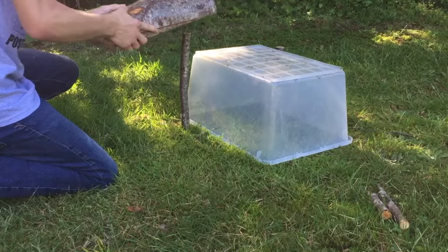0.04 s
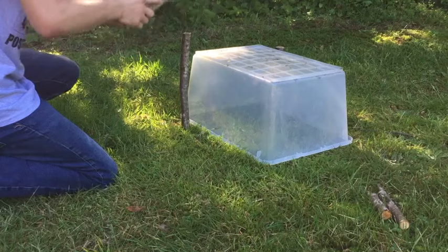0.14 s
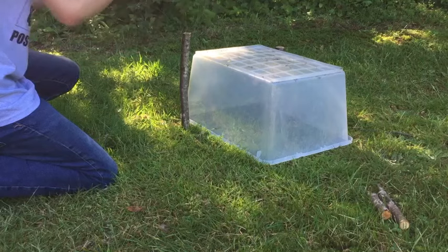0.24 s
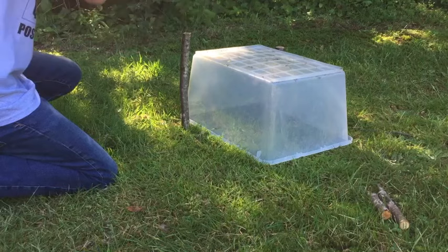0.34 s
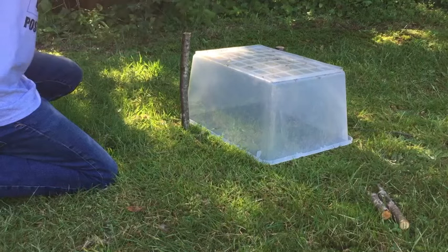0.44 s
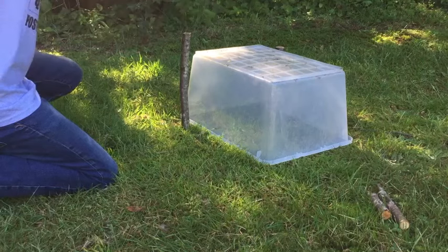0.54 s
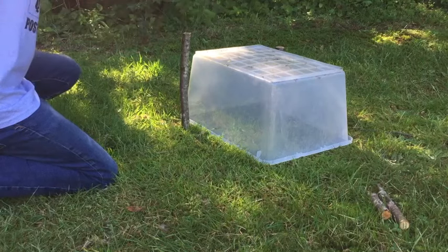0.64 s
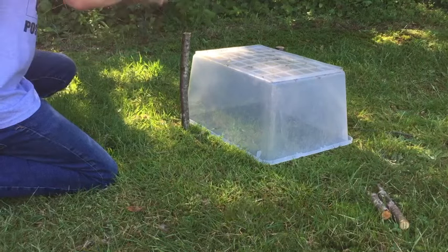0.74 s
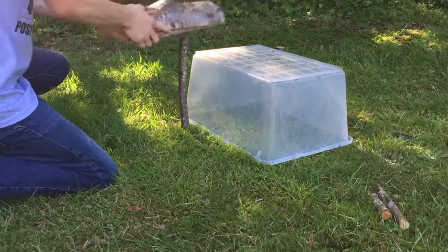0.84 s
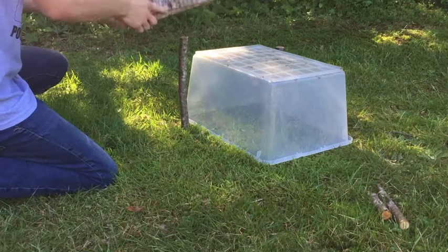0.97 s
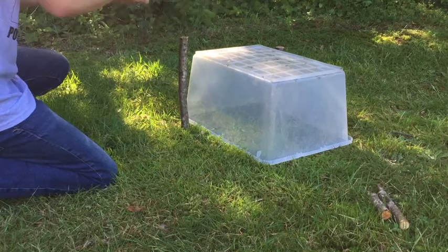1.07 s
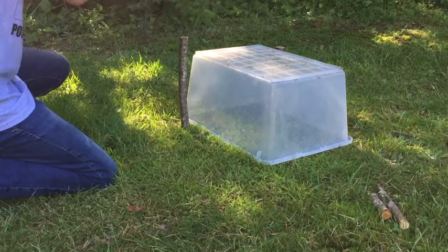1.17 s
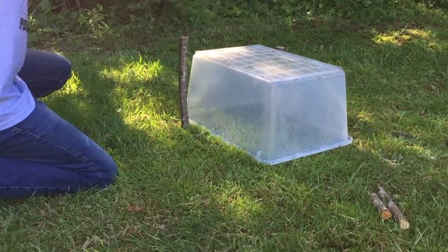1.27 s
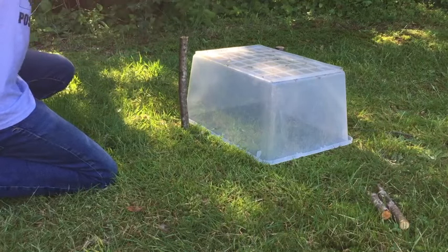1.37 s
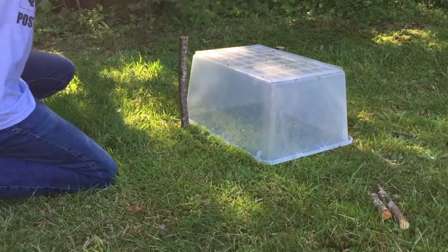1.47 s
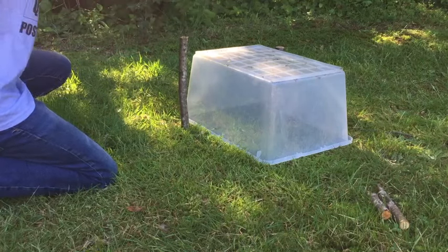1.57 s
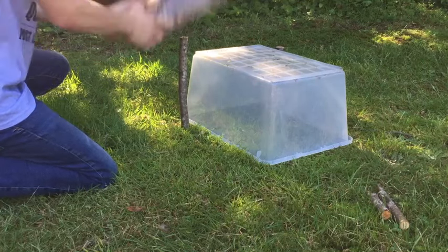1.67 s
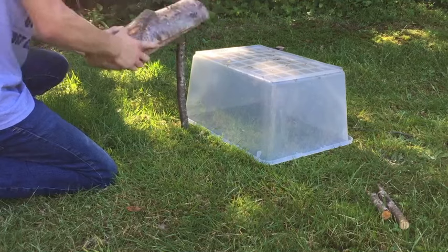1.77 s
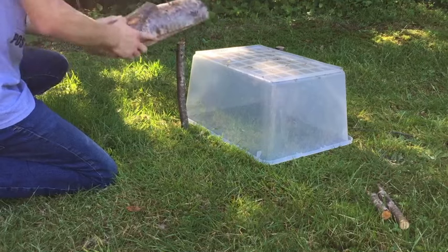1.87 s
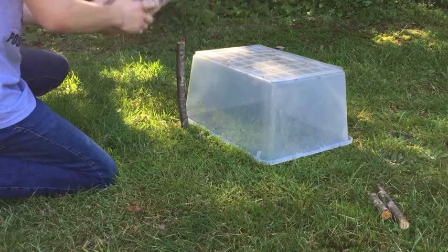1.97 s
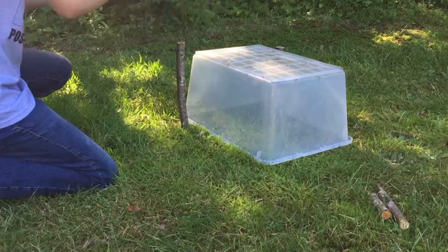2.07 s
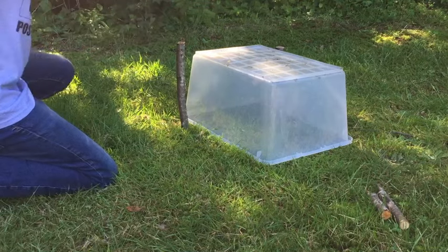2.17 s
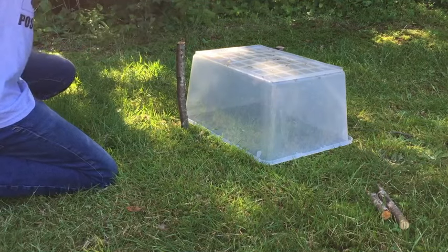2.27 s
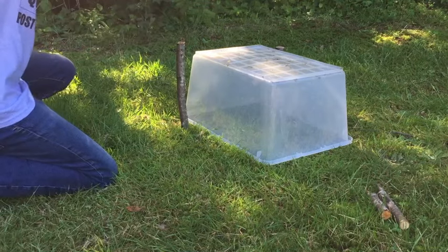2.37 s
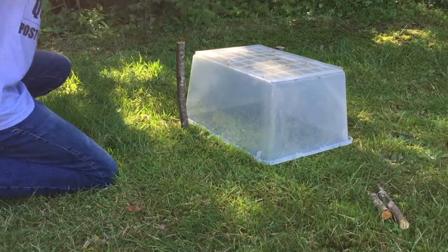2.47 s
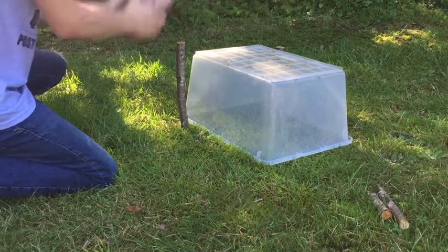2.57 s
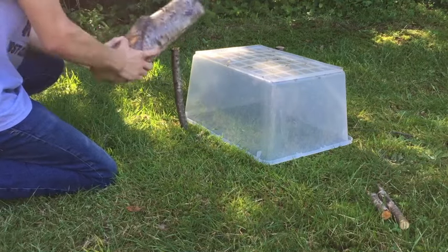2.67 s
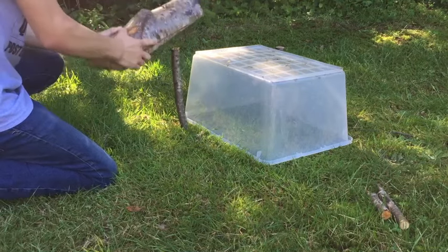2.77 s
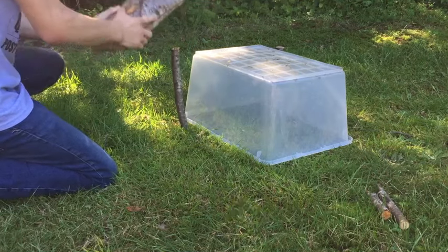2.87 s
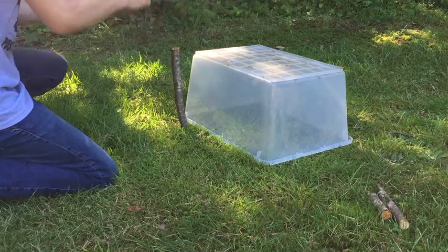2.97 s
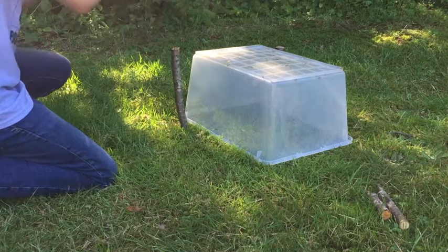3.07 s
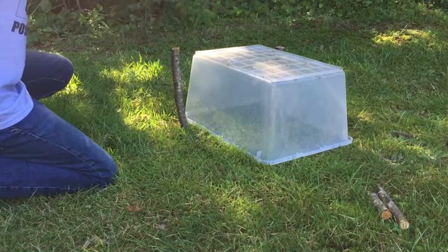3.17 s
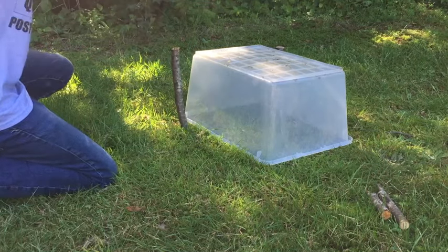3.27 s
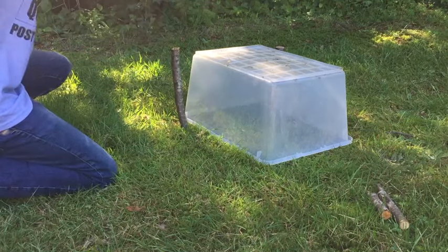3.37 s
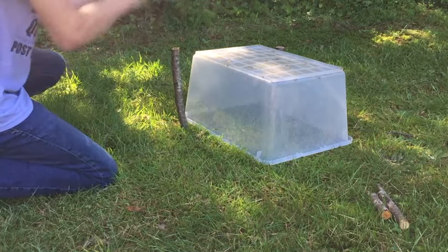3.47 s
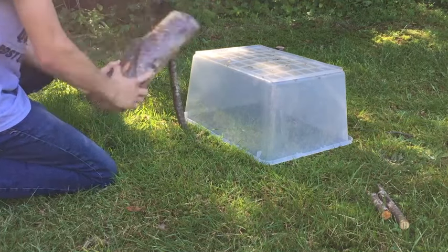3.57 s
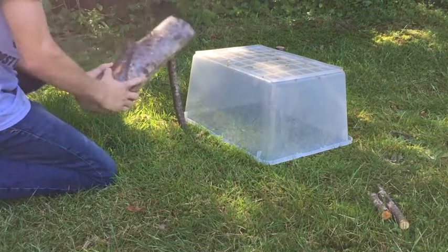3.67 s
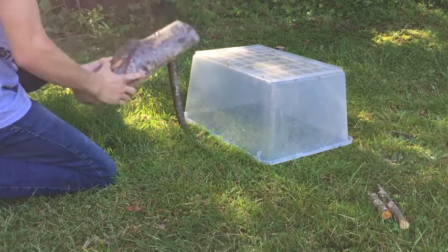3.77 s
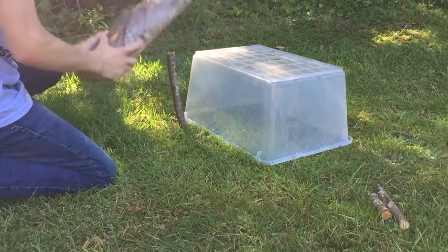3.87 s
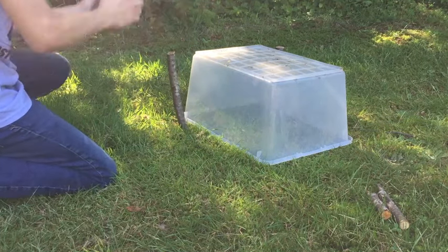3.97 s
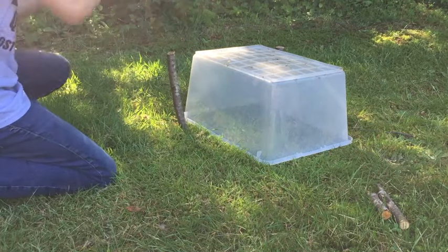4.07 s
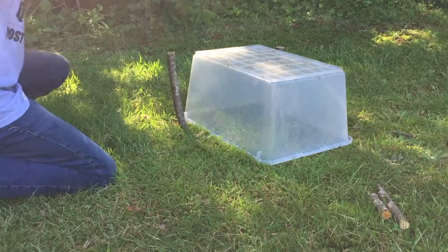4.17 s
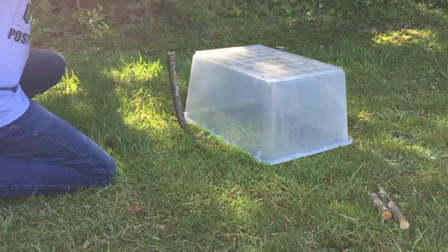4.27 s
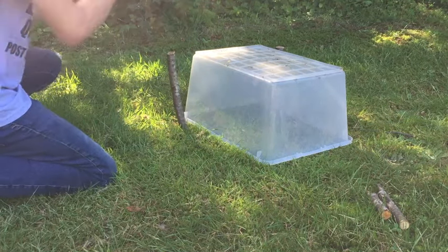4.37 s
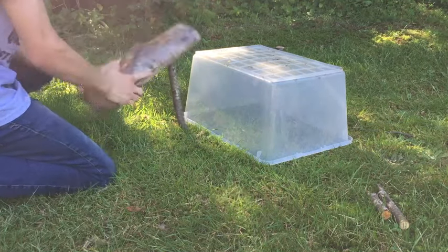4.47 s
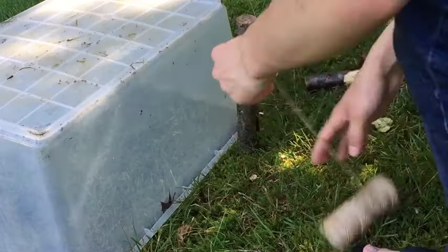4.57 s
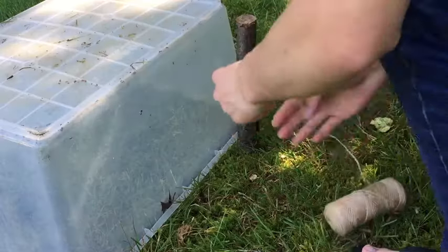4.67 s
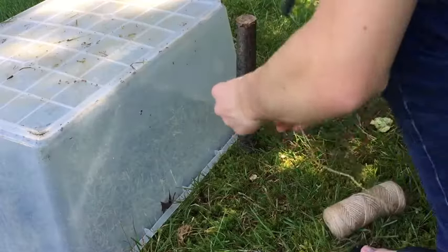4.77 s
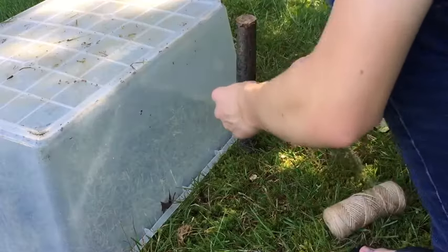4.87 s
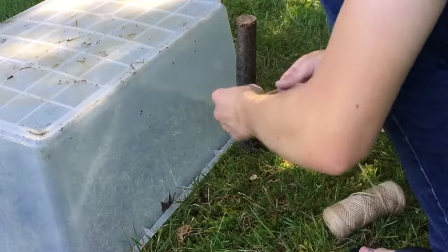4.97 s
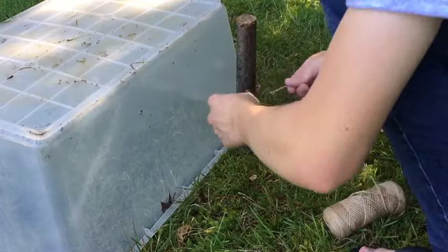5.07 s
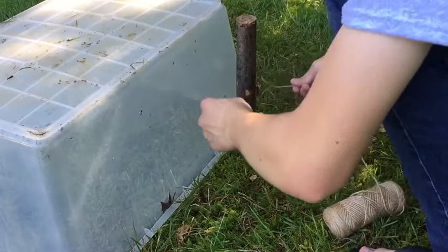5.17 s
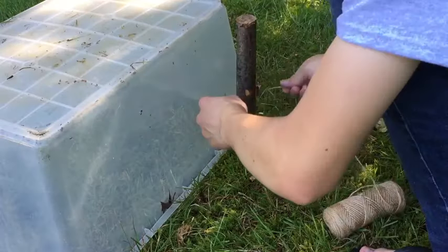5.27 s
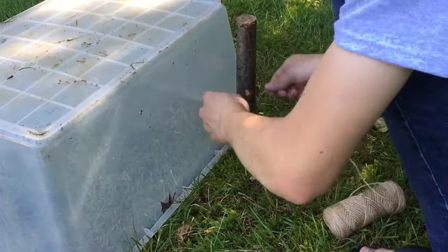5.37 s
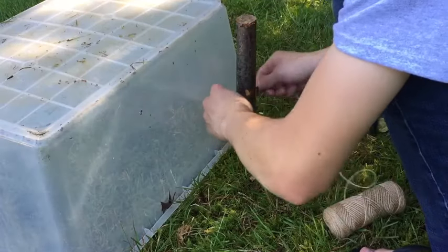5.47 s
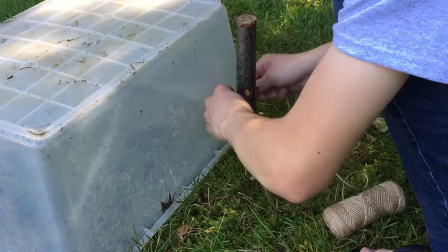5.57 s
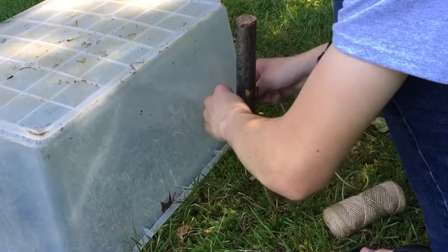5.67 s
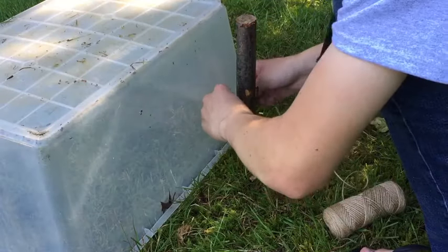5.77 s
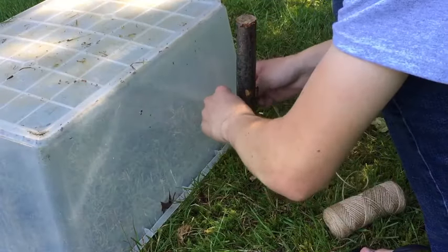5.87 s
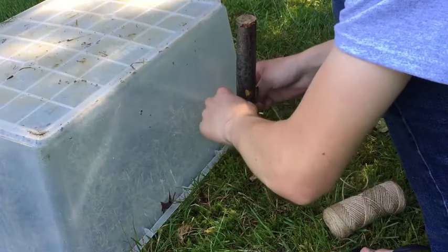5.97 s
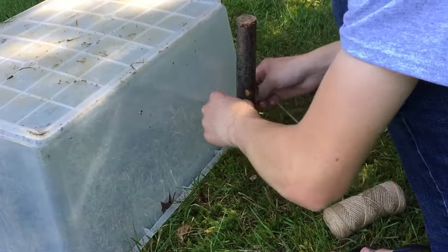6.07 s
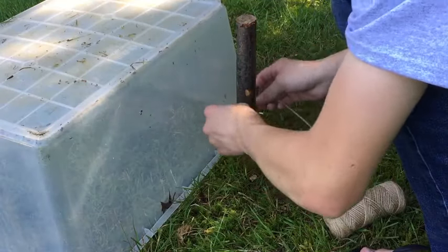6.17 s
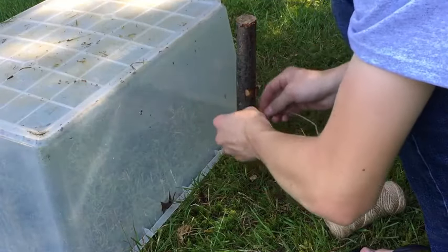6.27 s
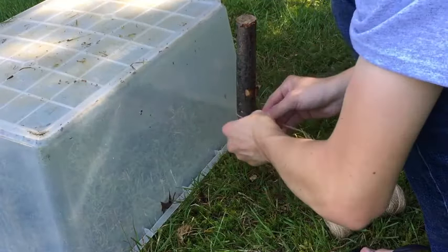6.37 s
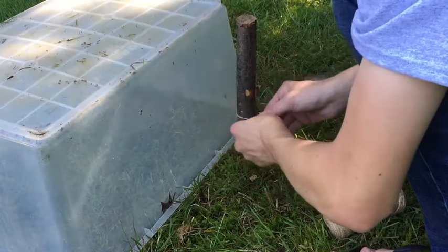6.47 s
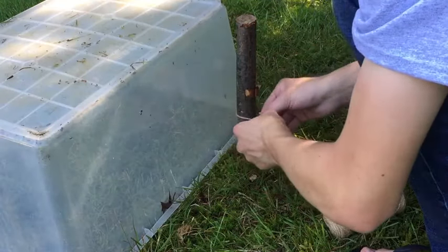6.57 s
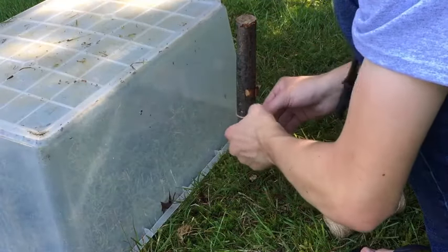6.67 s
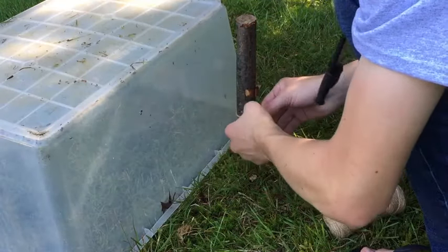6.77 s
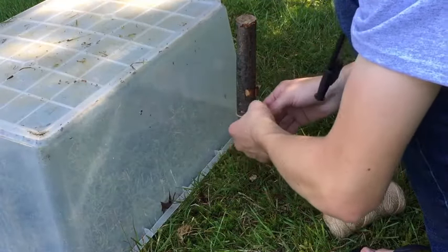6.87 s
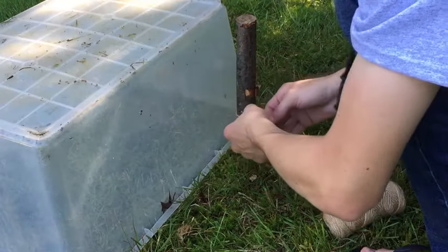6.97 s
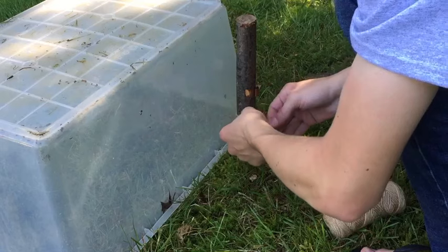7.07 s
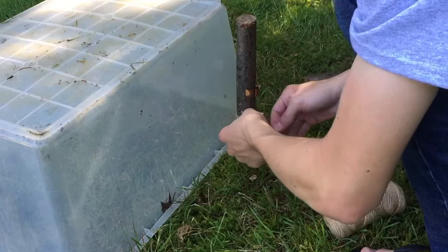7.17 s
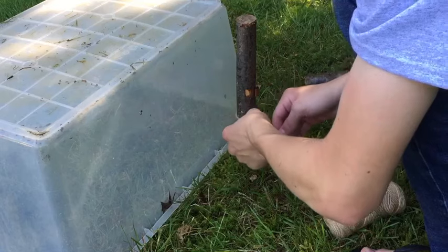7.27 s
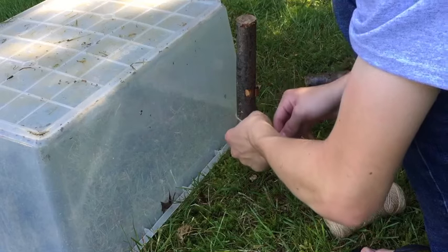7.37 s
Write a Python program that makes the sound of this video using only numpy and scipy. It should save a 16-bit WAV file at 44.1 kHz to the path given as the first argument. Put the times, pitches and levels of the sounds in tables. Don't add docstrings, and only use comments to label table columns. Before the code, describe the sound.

Five sharp wooden knocks, a log pounding a stake into lawn at steady intervals, with faint birdsong, then a quieter close view of soft handling.

```python
import sys
import numpy as np
from scipy import signal
from scipy.fft import rfft, irfft
from scipy.io import wavfile
from scipy.ndimage import uniform_filter1d

SR = 44100
rng = np.random.default_rng(int(sys.argv[2]) if len(sys.argv) > 2 else 0)


def makeup_ratio(level_db):
    decades = np.asarray(level_db, float) / 20
    return 10 ** decades


def to_wav(s):
    ch = np.atleast_2d(s).T
    pcm = np.round(np.clip(ch, -1, 1) * 32767)
    wavfile.write(sys.argv[1], SR, pcm.astype(np.int16))


N = 327663
CUT_S = 4.607
LEAD_S = .3
T = np.arange(N + int(LEAD_S * SR)) / SR - LEAD_S


def seconds(length_s):
    return np.arange(int(length_s * SR)) / SR


def noise(t):
    return rng.standard_normal(len(t))


def unit(x):
    return x / np.sqrt(np.mean(x ** 2))


def band(x, lo_hz, hi_hz):
    return signal.sosfilt(signal.butter(2, [lo_hz, min(hi_hz, .45 * SR)], "band", fs=SR, output="sos"), x)


def steep_band(x, lo_hz, hi_hz):
    return band(band(x, lo_hz, hi_hz), lo_hz, hi_hz)


def fade(t, t60):
    return np.exp(-np.log(1000) * t / t60)


def onset(t, rise_s):
    return 1 - np.exp(-t / rise_s)


def add(out, s, x):
    i = max(int(round((s + LEAD_S) * SR)), 0)
    out[i:i + len(x)] += x[:len(out) - i]


def walk(rate):
    k = int(SR / rate)
    steps = np.repeat(rng.standard_normal(len(T) // k + 1), k)
    return 0.56 * uniform_filter1d(uniform_filter1d(steps, k), k)[:len(T)]


def knock(modes, wood_db, late):
    crest_s = .0024
    t = seconds(.06)
    ring = 0
    for k, (hz, width, db) in enumerate(modes):
        width = max(width, hz / 18)
        low = hz < 700
        start = crest_s - 0.26 / hz if low else late * (hz > 3000)
        age = np.maximum(t - start, 0)
        swell = onset(age, .001 if hz < 3000 else .0006) * np.exp(-np.pi * width * age)
        sign = 1 if low else (-1) ** k
        ring = ring + sign * makeup_ratio(db) * width ** 1.15 * swell * np.sin(2 * np.pi * hz * age)
    return makeup_ratio(wood_db) * ring / np.abs(ring).max()


def crack(db, spit_db):
    t = seconds(.06)
    shape = (1.4 * fade(t, 0.0049) + .04 * fade(t, 0.03)) * onset(t, 0.00029) ** 2
    spit = makeup_ratio(spit_db) * band(noise(t), 10500, 14500) * 2 * fade(t, .004) * onset(t, .0005) ** 2
    return makeup_ratio(db + 1.5) * band(band(noise(t), 1900, 9800) * shape + spit, 2000, 19000)


def thump(db, sooner, quick_db):
    # f/Hz, level/dB, decay t60/s, delay t/s, sign of first swing
    soil = [(65.8, -2.5, 0.23, 0.0026, -1), (141, 6.5, 0.035, 0.0041, 1), (208, -5.5, 0.03, 0.0081, 1),
            (282, -11.5, 0.033, 0.0058, -1), (70.84, -15.5, 0.4, 0.0044, -1)]
    t = seconds(.45) - .03
    ring = 0
    for hz, wave_db, t60, late, swing in soil:
        quick = hz > 100
        age = np.maximum(t - late + sooner * quick, 0)
        wave = fade(age, t60) * np.sin(2 * np.pi * hz * age)
        ring = ring + np.sign(swing) * makeup_ratio(wave_db + quick_db * quick) * wave
    bass_cut = signal.butter(4, 45, "high", fs=SR, output="sos")
    return makeup_ratio(db) * signal.sosfiltfilt(bass_cut, uniform_filter1d(ring, size=80))


def garden():
    # low f/Hz, high f/Hz, decay t60/s, level/dB
    echo_bands = [(220, 800, 0.48, -40.5), (300, 1300, 0.13, -38.5), (1025, 8600, 0.19, -39),
                  (3488, 7000, 0.2, -42), (7536, 27000, 0.074, -39.5), (1370, 9600, 0.99, -54),
                  (3300, 21000, 1, -53)]
    # t/s, spread t/s, gain
    hedges = [
        (.043, .009, .8),
        (.112, 0.014, .5),
        (.21, 0.033, 0.47),
    ]
    t = seconds(1.2)
    density = 1 - 0.63 * np.exp(-t / 0.0049)
    for s, spread, gain in hedges:
        density = density + gain * np.exp(-((t - s) / spread) ** 2)
    return density * sum(makeup_ratio(db) * fade(t, t60) * band(noise(t), lo, hi) for lo, hi, t60, db in echo_bands)


def tinted(echo, sound):
    size = 2 * len(echo)
    spread_hz = 220
    power = uniform_filter1d(np.abs(rfft(sound, size)) ** 2, size=int(spread_hz * size / SR))
    return irfft(rfft(echo, size) * np.sqrt(np.abs(power)), size)[:len(echo)]


def blows():
    # t/s, wood level/dB, crack level/dB, soil level/dB, echo level/dB
    strikes = [
        (-.085, -2.5, -30, -18, -15),
        (.8400, -4, -14.5, -20, -10.5),
        (1.7408, -3, -15, -19.5, -7.5),
        (2.6586, 6, -0.5, -18.5, -9),
        (3.602, 3, -9.5, -18, -13),
        (4.524, 1.5, -6, -20, -8),
    ]
    # f/Hz, width f/Hz, level/dB
    bodies = [
        [(480, 320, -2), (1620, 57, 8), (3080, 490, 4)],
        [(500, 210, 3), (985, 78, -5), (1282.6, 78, -3), (1710, 130, 1), (2090, 140, 5), (296, 83, -0.5)],
        [(560, 210, -2.5), (1190, 130, -9), (1910, 300, 0), (308, 130, -4.5), (2480, 180, -9), (950, 470, -9)],
        [(300, 100, -4.5), (864.7, 110, -1.5), (1470, 130, 1), (2200, 240, 2), (550, 140, -7), (2390, 110, -8),
         (1277, 130, -10), (400, 110, -8.5), (1677, 67, -8)],
        [(438.7, 340, 0), (1607, 142.3, 5.5), (1290, 162.5, -2.5), (1151, 200, -7.5), (288.6, 85, -16.5),
         (1460, 96, -2.5)],
        [(460, 256, 2), (800, 930, -5), (1142.4, 100, -4), (1420, 85, 2.5), (2130, 110, -3.5),
         (2700, 530, -3.5), (290, 75, -14)],
    ]
    # f/Hz, level/dB
    grains = [
        [],
        [(2610, -8.5), (4400, -20), (5600, -8.5), (6300, -15.5), (9500, -20.5)],
        [(3420, -19), (4090, -21), (5550, -25), (6300, -20), (8800, -22.5)],
        [(2620, -12), (2900, -4), (3500, -12.5), (4070, -20), (4610, -18), (6500, -12.5), (8700, -16),
         (12200, -19)],
        [(2770, -15.5), (3420, -12), (3950, -22), (4600, -24), (5250, -26.5), (6000, -20.5), (8640, -22),
         (12000, -21)],
        [(1780, -9), (3100, -10), (3976, -6.5), (5100, -23.5), (8482, -14.5)],
    ]
    grain_width = 0.05
    # t/s, one a blow
    treble_lates = [0.0006, 0.00052, .0006, .0006, 0.000065, .0006]
    # advance t/s, level/dB
    quicks = [(0, 0), (0, 0.5), (.0006, -1), (.0002, -2.5), (.0018, 1), (.0018, 3.5)]
    # ring of the wood level/dB, colourless slap level/dB; then top spit of the crack level/dB
    echo_mixes = [(-2.5, 4, -2), (-1, 4.5, -4), (-4, 7.5, -1.5), (-4.5, 6, 1), (-0.5, 6.5, -6),
                  (-5.5, 8, -13)]
    murmurs = [-60, -41.5, -40.5, -38, -36.5, -41.5]
    soil_lag_s = .0124
    out = np.zeros(len(T))
    rows = zip(strikes, bodies, grains, treble_lates, quicks, echo_mixes, murmurs)
    for strike, body, upper, late, quick, (ring_db, slap_db, spit_db), murmur_db in rows:
        s, wood_db, crack_db, soil_db, echo_db = strike
        modes = body + [(hz, grain_width * hz, db) for hz, db in upper]
        wood = knock(modes, wood_db, late)
        snap = crack(crack_db, spit_db)
        add(out, s, wood)
        add(out, s + late, snap)
        add(out, s + soil_lag_s - .0325, thump(soil_db, *quick))
        echo = garden()
        blur = np.exp(-np.arange(len(wood)) / SR / .0025)
        add(out, s, makeup_ratio(echo_db + ring_db) * tinted(echo, steep_band(wood * blur, 200, 4200)))
        add(out, s, makeup_ratio(echo_db + wood_db + slap_db) * band(echo, 250, 4300))
        treble = band(echo, 2200, 12000) * fade(np.arange(len(echo)) / SR, .5)
        add(out, s, makeup_ratio(echo_db + crack_db + 11.5) * treble)
        t = np.arange(600) / SR
        smear = noise(t) * fade(t, .03) / 8
        murmur = signal.fftconvolve(band((wood + snap) * blur, 200, 5000), smear)
        add(out, s - .0229, makeup_ratio(murmur_db - 3) * murmur)
        add(out, s - .011, makeup_ratio(murmur_db - 6) * murmur)
    return out


def soft_thuds():
    # t/s, f/Hz, decay t60/s, level/dB, rise t/s
    bumps = [(.002, 500, 0.041, -53, .0001), (.941, 320, 0.023, -39, 0.00054),
             (1.842, 318, 0.019, -39, 0.00036), (2.762, 324, 0.0246, -44, 0.00055),
             (2.778, 2700, 0.043, -52, 0.000081), (2.781, 300, 0.026, -45, 0.00023),
             (3.7053, 300, 0.021, -37, .0005), (3.7729, 160.6, 0.076, -24, 0.0047),
             (3.7688, 445, .02, -40, .0001), (3.7685, 1366, .025, -53, 0.00006)]
    out, t = np.zeros(len(T)), seconds(.15)
    for s, hz, t60, db, rise in bumps:
        tone = -min(300 / hz, 1) * np.sin(2 * np.pi * hz * t)
        rub = min((hz / 500) ** 2, 1) * unit(steep_band(noise(t), .4 * hz, 1.9 * hz))
        add(out, s, makeup_ratio(db) * fade(t, t60) * onset(t, rise) * (tone + rub))
    return out


def ticks():
    # t/s, low f/Hz, high f/Hz, decay t/s, level/dB
    clicks = [(1.856, 6000, 15100, 0.0024, -71), (2.805, 6980, 15450, 0.028, -66.5),
              (3.526, 3115, 8850, 0.00043, -50), (4.39, 800, 2006, 0.0047, -67),
              (4.756, 4290, 6400, 0.007, -58.5), (4.757, 6500, 16000, 0.0065, -50),
              (4.765, 3700, 7000, .003, -62), (4.855, 981.4, 4480, 0.0013, -56),
              (4.856, 10900, 16550, 0.00128, -59), (4.867, 2458, 4463, 0.0011, -58),
              (5.017, 5060, 14000, 0.0021, -64), (5.058, 2007, 4003, 0.0022, -69)]
    out, t = np.zeros(len(T)), seconds(0.044)
    for s, lo, hi, length, db in clicks:
        click = unit(band(noise(t), lo, hi)) * np.exp(-t / length) * onset(t, 0.00036)
        add(out, s, makeup_ratio(db) * click)
    return out


def rustle():
    # middle t/s, length t/s, low f/Hz, high f/Hz, level/dB
    brushes = [
        (5.0, 1.17, 400, 2610, -80),
        (6.097, 1.04, 759, 1202, -87),
        (6.799, 1.4, 2300, 3567, -96.5),
    ]
    out = 0
    for s, length, lo_hz, hi_hz, db in brushes:
        swell = np.clip(1 - (2 * (T - s) / length) ** 2, 0, 1)
        out = out + makeup_ratio(db + 6.1 * walk(33)) * swell * unit(band(noise(T), lo_hz, hi_hz))
    return out


def note(length, hz0, hz1, hz2, db, unsteady_db=3.5, pointed=False):
    u = np.linspace(0, 1, int(length * SR))
    if pointed:
        hz = np.interp(u, [0, .5, 1], [hz0, hz1, hz2])
    else:
        hz = hz0 * 2 * (u - .5) * (u - 1) - hz1 * 4 * u * (u - 1) + hz2 * 2 * u * (u - .5)
    flutter = uniform_filter1d(rng.standard_normal(int(.3 * SR)), 300)[:len(u)] * 17
    phase = 2 * np.pi * np.cumsum(hz * (1 + .008 * flutter[::-1])) / SR
    return makeup_ratio(db + unsteady_db * flutter) * np.sin(np.pi * u) ** .6 * np.sin(phase)


def songs(near, far, deep):
    syllables = {"hold": (.065, .99, 1.0, 1.01, .1), "flick": (.045, .74, .9, 1.0, .75),
                 "drop": (.06, 1.0, .9, .97, .9), "rise": (.05, .62, .86, 1.0, 1.0),
                 "dip": (.07, 1.25, 1.0, 1.2, .45), "peak": (.045, .89, 1.0, .88, .6),
                 "arch": (.044, .85, 1.0, .76, .4), "chip": (.013, 1.16, 1.03, .99, .1),
                 "chup": (.017, 1.36, 1.04, 1.0, .1), "pip": (.022, 1.06, 1.0, .96, .1),
                 "fall": (.03, 1.14, .98, .86, .4)}
    warbles = {"hold": [(.802, 2600, -57.5), (.955, 2575, -58), (1.095, 2630, -56.5), (1.25, 2614, -67)],
               "flick": [(.872, 3560, -58), (1.008, 3400, -63), (.95, 3550, -64), (1.08, 3550, -66),
               (1.155, 3750, -62), (2.915, 3250, -62), (3.035, 4080, -66), (3.112, 4100, -69),
               (2.775, 3050, -64)], "drop": [(.93, 3570, -71), (1.067, 3550, -69), (1.21, 3590, -70),
               (4.12, 4600, -75), (4.29, 4700, -74), (4.39, 3300, -72)], "rise": [(.655, 5500, -71),
               (1.79, 5200, -61), (1.88, 5300, -65), (1.97, 5250, -74), (2.42, 6200, -75),
               (3.76, 5733, -71)], "dip": [(4.072, 3776, -71), (4.16, 3850, -71), (4.242, 3830, -72.5),
               (5.535, 3790, -68), (5.62, 3740, -70), (5.725, 3740, -71)], "peak": [(2.72, 2900, -64),
               (4.14, 4500, -77), (4.235, 4600, -76), (5.742, 4300, -69), (4.385, 3150, -70),
               (4.315, 3750, -72), (5.585, 4700, -73), (5.67, 4740, -72)]}
    contact_calls = {"arch": [(.087, 8200, -59), (.246, 9050, -58)], "fall": [(.004, 7250, -60)],
                     "chip": [(3.07, 8000, -76), (3.232, 8150, -67), (3.291, 7750, -70),
                     (3.352, 7800, -71)], "chup": [(3.242, 6300, -69), (3.3, 6400, -69),
                     (3.361, 6450, -77)], "pip": [(1.427, 2750, -75), (1.953, 2800, -61), (2.41, 2800, -71),
                     (4.318, 4750, -77), (4.355, 2750, -66)]}
    for name, calls in {**warbles, **contact_calls}.items():
        length, *bend, depth = syllables[name]
        for s, hz, db in calls:
            call = note(length, *np.multiply(bend, hz), db, pointed=name == "arch")
            depth = np.clip(depth, 0, 1)
            add(near, s, (1 - depth) * call)
            add(deep if depth >= 1 else far, s, depth * call)


def whistles(near, far):
    # t/s, length t/s, f/Hz at start, middle, end
    swoops = [
        (4.256, .05, 3250, 3780, 3100),
        (4.305, .05, 2950, 2690, 3200),
        (4.24, .02, 2600, 2800, 2950),
        (4.45, .07, 3750, 2850, 2850),
    ]
    swoop_db = [-65, -61, -68, -63]
    # t/s, length t/s, f/Hz, level/dB
    near_held = [(0.124, 0.078, 4760, -81), (.16, 0.0584, 6180, -73.5), (.173, 0.02, 8000, -58),
                 (.245, 0.078, 6300, -73), (1.341, 0.06, 2860, -73.5), (1.668, 0.061, 4820, -69.5),
                 (1.871, 0.051, 2874, -52.5), (2.028, 0.05, 2884, -71.5), (2.147, 0.0674, 2940, -77.5),
                 (2.8, 0.033, 3036, -67), (2.864, 0.027, 2935, -64), (2.9, 0.031, 2970, -59),
                 (2.859, .03, 1500, -68), (2.948, 0.056, 3260, -63.5), (3.094, 0.032, 3300, -64.5),
                 (3.101, 0.069, 3070, -71.5), (4.21, 0.11, 5080, -83), (3.705, 0.29, 4650, -74),
                 (4.084, .016, 3845, -70), (4.106, .075, 3757, -69), (4.178, 0.029, 3830, -62.5),
                 (4.25, 0.055, 3750, -71), (4.325, .02, 4730, -73.5), (4.129, 0.0687, 5230, -78.5),
                 (4.172, 0.035, 1178, -72), (4.213, .03, 3820, -68), (5.67, 0.08, 5188, -76),
                 (5.55, .11, 5150, -83.5), (1.05, 0.015, 4546, -87), (1.102, 0.014, 4580, -79.5),
                 (6.461, 0.041, 2388, -82)]
    # t/s, length t/s, f/Hz, level/dB
    far_held = [(0, .1, 3200, -73), (.163, .06, 3120, -79), (.403, .03, 4100, -77), (.62, .02, 5300, -76),
                (.905, .04, 3500, -68), (1.045, .04, 3500, -67), (1.12, .04, 3500, -71),
                (1.46, .06, 7750, -85), (2.07, .05, 1080, -84), (2.02, .06, 1850, -84),
                (2.79, .12, 2980, -71), (.03, .08, 1660, -80), (2.775, .075, 1500, -68),
                (5.35, .06, 830, -84), (5.762, .12, 980, -85), (6.195, .2, 1120, -89)]
    for (s, *rest), db in zip(swoops, swoop_db):
        call = note(*rest, db, unsteady_db=2.5)
        add(near, s, call)
        add(far, s, .1 * call)
    for place, table, sag in (near, near_held, .03), (far, far_held, -.07):
        for s, length, hz, db in table:
            add(place, s, note(length, hz * (1 + sag / 2), hz, hz * (1 - sag / 2), db))


def trills(out):
    # t/s, notes, gap t/s, first f/Hz, second f/Hz
    twitters = [
        (2.0, 6, .021, 7400, 7850),
        (2.414, 5, .0215, 7850, 7400),
        (3.063, 11, .0172, 7150, 7350),
    ]
    gap_s, from_hz, to_hz = .046, 4620, 4240
    for k in range(12):
        pip = note(.6 * gap_s, from_hz, (from_hz + to_hz) / 2, to_hz, -73.5, unsteady_db=1.5)
        add(out, 1.203 + k * gap_s, pip)
    for s, count, gap, *pitches in twitters:
        for k in range(count):
            hz = pitches[k % 2]
            add(out, s + k * gap, note(.5 * gap, hz, hz, hz, -77, unsteady_db=2))


def birds():
    near, far, trill, deep = np.zeros((4, len(T)))
    songs(near, far, deep)
    whistles(near, far)
    trills(trill)
    t = seconds(.8)
    leaves = noise(t) * onset(t, 0.005)
    trees = band(leaves, 600, 5600) * fade(t, .5) + 0.9 * band(leaves, 5600, 11000) * fade(t, .28)
    thicket = makeup_ratio(-24) * signal.fftconvolve(deep, trees * onset(t, .03))[:len(T)]
    trees = trees + 2.2 * fade(t, .07) * band(leaves, 600, 11000)
    direct = near + trill + makeup_ratio(-14) * far
    sent = makeup_ratio(-38) * near + makeup_ratio(-42.5) * trill + makeup_ratio(-28.5) * far
    return thicket + direct + signal.fftconvolve(sent, trees)[:len(T)]


def motor():
    # multiple, level/dB
    harmonics = [(1, -0.5), (2, -8), (3, -23), (5, -27.5), (6, -37)]
    # t/s, level/dB
    course = [(0, -58), (.8, -55.5), (1.6, -58), (2.5, -59.5), (3.4, -61), (4.6, -61)]
    phase = 2 * np.pi * np.cumsum(75.8 * (1 + .003 * walk(6))) / SR
    stack = sum(makeup_ratio(db + 0.5 * walk(11.0)) * np.sin(k * phase + k) for k, db in harmonics)
    return np.sqrt(2) * stack * makeup_ratio(np.interp(T, *np.transpose(course)))


def air(shape, db, gust_db):
    hz = np.maximum(np.arange(len(T) // 2 + 1) * SR / len(T), 1)
    shape_hz, shape_db = np.transpose(shape)
    spectrum = rfft(noise(T)) * makeup_ratio(np.interp(np.log(hz), np.log(shape_hz), shape_db))
    spectrum[hz > 15400] *= .1
    out = 0
    for k in range(10):
        share = np.cos(np.pi / 2 * np.clip(np.log2(hz / 32) - k, -1, 1)) ** 2
        gust = gust_db * walk(3.3) / (1 + k / 0.7) ** 2
        out = out + irfft(spectrum * share, len(T)) * makeup_ratio(gust + 2.4 * walk(0.95))
    return unit(out) * makeup_ratio(db)


def wide_view():
    # f/Hz, density level/dB per Hz
    spectrum = [(18, -76), (30, -44), (58, -11), (81, -4.5), (116, -12), (159, -14), (255, -26.5),
                (377, -35), (762, -38.5), (1190, -39.5), (3740, -42.5), (4370, -47.5), (4860, -46),
                (15300, -59)]
    # t/s, level/dB
    swell = [(0, -4), (.8, -5), (1.6, -5), (2.5, -4.5), (3.4, -4), (4.6, -4)]
    return air(spectrum, -56.5, 1.3) * makeup_ratio(np.interp(T, *np.transpose(swell)))


def close_view():
    # f/Hz, density level/dB per Hz
    spectrum = [(18, -54), (30, -39), (47, -8.5), (90, 1), (140, -1), (163, -6.5), (224, -17.5),
                (261, -15.5), (339, -25.5), (846, -28), (1620, -32.5), (3040, -32), (4860, -37.5),
                (15300, -45)]
    # middle t/s, length t/s, level/dB
    gust_table = [(4.66, 0.088, -71), (4.851, 0.14, -68.5), (5.002, 0.056, -66.5), (5.125, 0.062, -61.5),
                  (5.332, 0.25, -67.5), (5.57, 0.087, -69), (5.897, 0.42, -70.5), (6.407, 0.043, -66),
                  (6.73, 0.5, -68), (7.048, 0.076, -74.5), (7.181, 0.051, -65), (7.366, 0.076, -65.5)]
    lull_db, edge_s = -71.5, 0.04
    calm = air(spectrum, -62, 1.8)
    low = signal.sosfiltfilt(signal.butter(2, 210, fs=SR, output="sos"), calm)
    gusts = 0
    for s, length, db in gust_table:
        gusts = gusts + makeup_ratio(db) * np.clip((length / 2 - np.abs(T - s)) / edge_s + .5, 0, 1)
    return calm - low + unit(low) * (makeup_ratio(lull_db) + gusts)


def scene():
    wide = blows() + soft_thuds() + motor() + wide_view()
    before = np.clip((CUT_S - T) / 0.00085, 0, 1)
    hiss = makeup_ratio(-90.0) * unit(band(band(noise(T), 3800, 13000), 3700, 15300))
    out = before * wide + (1 - before) * close_view() + birds() + ticks() + rustle() + hiss
    return out[None, -N:]


def roll_off(x):
    return signal.sosfilt(signal.butter(12, 17030, fs=SR, output="sos"), x)


def record(dry):
    flattened = dry / (1 + np.abs(dry / .5) ** 4) ** .25
    top_cut = signal.ellip(8, .2, 70, 16400, fs=SR, output="sos")
    mix = signal.sosfilt(top_cut, flattened)
    return roll_off(mix)


dry = scene()
out = record(dry)
to_wav(out)
```